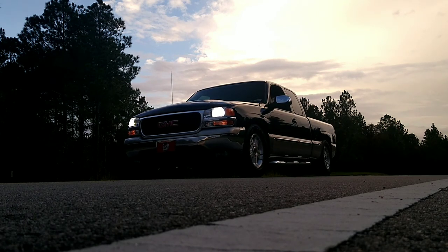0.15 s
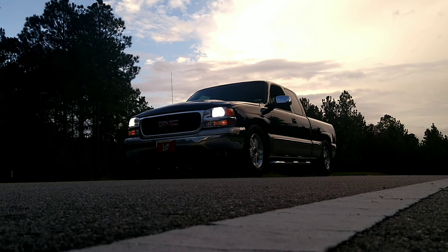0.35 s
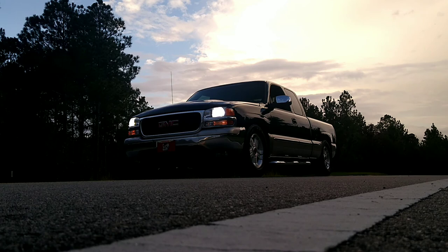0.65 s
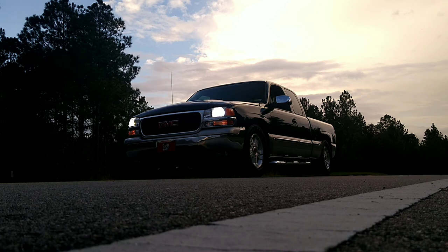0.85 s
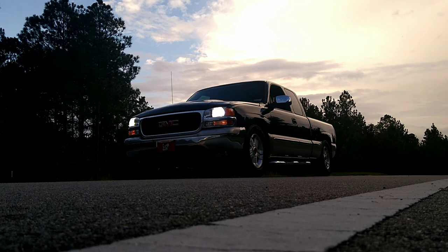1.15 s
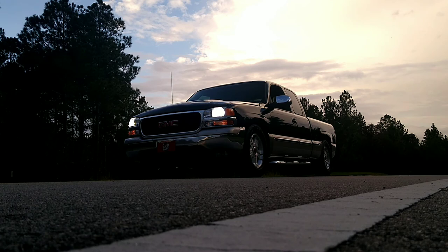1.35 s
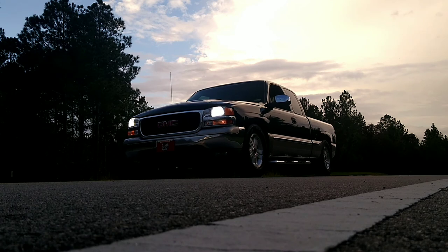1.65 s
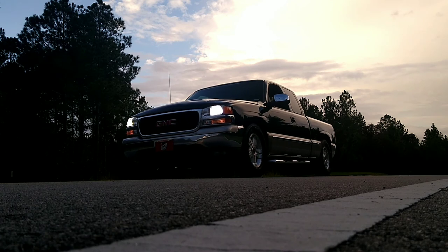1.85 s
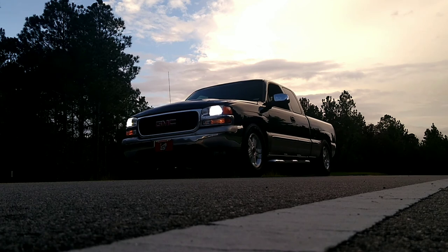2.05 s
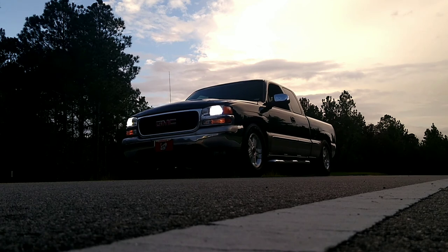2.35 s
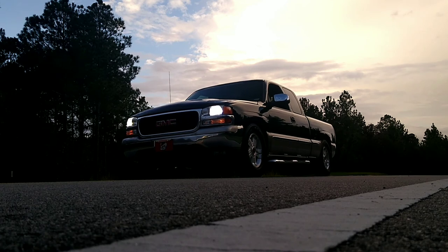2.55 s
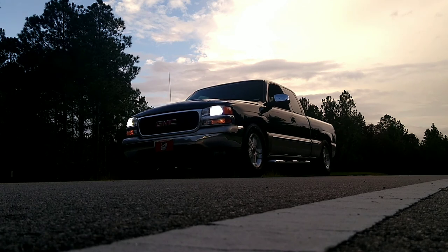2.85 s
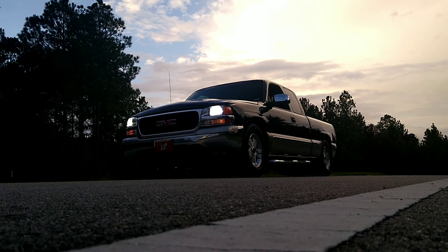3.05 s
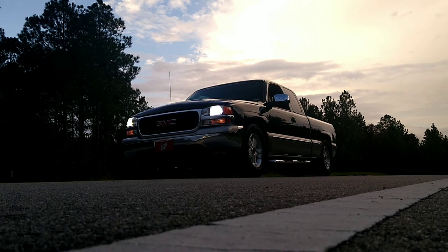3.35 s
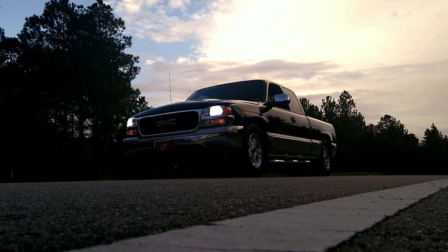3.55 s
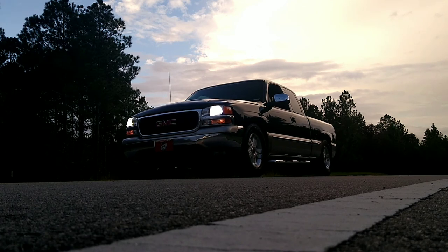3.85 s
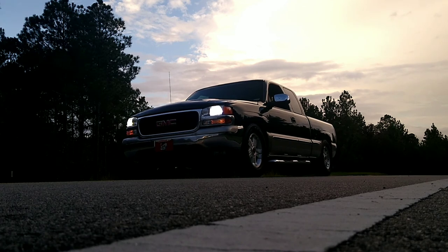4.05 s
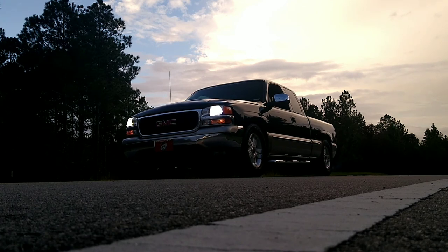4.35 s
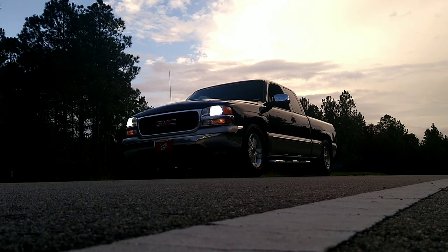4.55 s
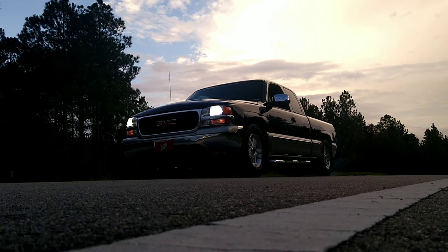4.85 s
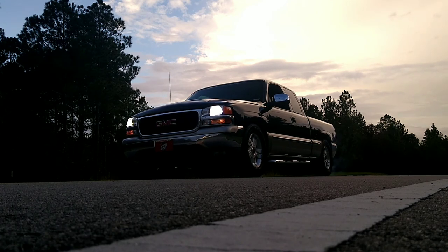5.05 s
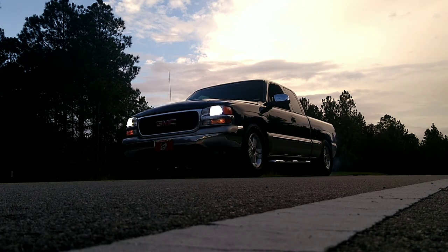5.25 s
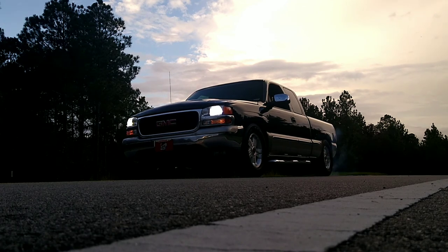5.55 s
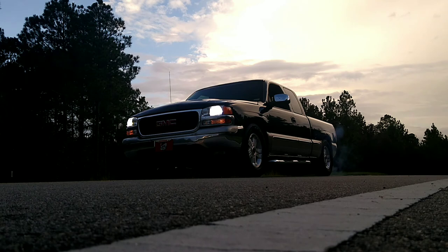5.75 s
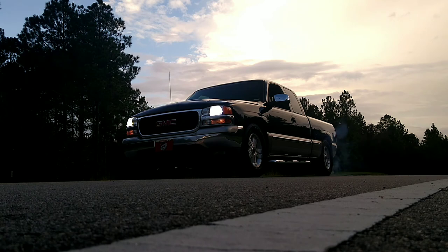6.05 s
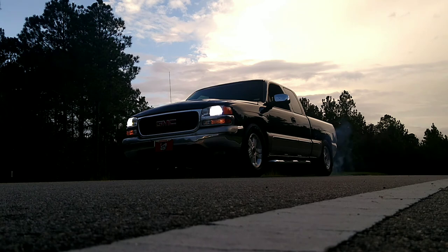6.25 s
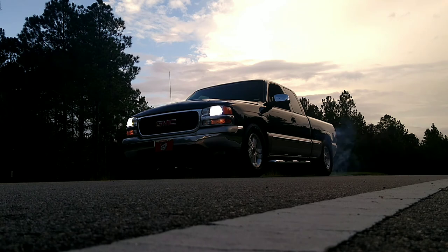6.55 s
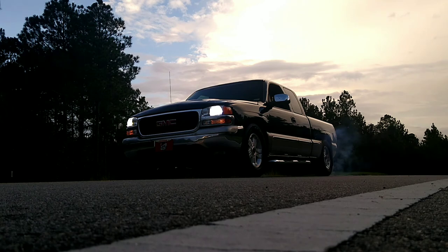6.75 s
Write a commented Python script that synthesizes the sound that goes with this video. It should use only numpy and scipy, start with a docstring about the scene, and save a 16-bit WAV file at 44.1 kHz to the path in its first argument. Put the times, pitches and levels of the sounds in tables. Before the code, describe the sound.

From 0 to 1.3 s a V8 pickup idles quietly outdoors: a low soft hum, slightly lumpy, slowing a little, with faint fan noise, hiss and thin belt whine. At about 1.27 s the intake gasps; from 1.4 s the throttle opens with uneven burbles, and the exhaust sweeps up, booming around 1.7 to 1.9 s, reaching a steady deep, raspy roar by 2.1 s with fan rush and faint whines. From 2.15 s tyre rubber scrubs hoarsely, several rough tones near 1.1 to 1.2 kHz under noisy spray. At 2.72 s, with a gruff thump, it scoops into one very loud squeal near 1.1 kHz. The squeal sways about twice a second, then faster, with chattering higher tones, flutter and tiny dropouts, slowly sagging and roughening. It sits slightly left above the held-back engine drone, which strains louder from 4.8 s. Both continue until the abrupt end at 6.9 s.

```python
"""On a road among trees, a V8 pickup idles, revs up against its brakes and spins its rear tyres.
The rubber first scrubs roughly: three patches of tone wander around one pitch, under a spray of noise.
Then it locks into one loud stick-slip squeal, a swaying sine with a second mode, sum tones and flutter.
The exhaust is a stack of lines at multiples of the cycle rate; coloured noise adds rasp, fan and hiss.
A gain control holds the loud parts down; the engine's lows sit in the middle and its highs spread wide."""
import sys
import numpy as np
from scipy import signal
from scipy.fft import rfft, irfft, next_fast_len
from scipy.io import wavfile
from scipy.ndimage import uniform_filter1d, minimum_filter1d, map_coordinates

SR = 44100
rng = np.random.default_rng(int(sys.argv[2]) if len(sys.argv) > 2 else 0)


def dump(signal):
    """Clip the signal to [-1, 1] and save it as 16-bit WAV at the path in sys.argv[1]."""
    limited = np.clip(np.atleast_2d(signal).T, -1, 1)
    pcm = np.round(limited * 32767).astype(np.int16)
    wavfile.write(sys.argv[1], SR, pcm)


N = 304731

# the tread locks into its squeal between these times [s]
CATCH_S, LOCKED_S = 2.715, 2.77
# the scrub swells, holds and dies away [s]
SCRUB_START_S, SCRUB_FULL_S, SCRUB_RELEASE_S, SCRUB_END_S = 2.14, 2.453, 2.7, 3.5

# moments when the rubber briefly loses its rhythm: (time [s], depth [dB], half width [s])
SKIP_DIPS = [(2.84, 7, 0.0097), (2.935, 7, .024), (3.674, 6, .006), (3.73, 7.5, .007), (4.112, 6, .005),
             (5.16, 5, .07), (5.315, 4.5, .016), (5.5, 4.5, 0.015), (5.64, 4.5, .018), (5.715, 3.5, 0.0087),
             (6.125, 5, .024), (6.735, 5.5, .008)]
# voices of the squeal: (level with cold rubber [dB], fade as it heats [dB/s])
MAIN_FADE = (3, 1.06)
SECOND_FADE = (-14, 2.5)
FAST_FLUTTER_FADE = (-16, 1.2)
SLOW_FLUTTER_FADE = (-20, 1.6)
# the main tone and its sum tones start this much weaker and recover as the scrub dies away
HELD_BACK_DB = 2


def squeal():
    """The main stick-slip tone, a second tread mode, their sum tones, and the flutter of the tread blocks."""
    db = fading(MAIN_FADE) - HELD_BACK_DB * (1 - rise(SCRUB_RELEASE_S, SCRUB_END_S))
    skip_db = bumps(SKIP_DIPS)
    # the rubber grows rougher as it heats; the roughness only ever dips the level
    heat = rise(2.7, 6.3)
    rough = 1 + 0.68 * heat
    falter_db = .4 * rough * wobble(110) ** 2
    main = angle(squeal_pitch(skip_db) + 4 * wobble(60)) + 0.056 * rough * wobble(260)
    # the second mode chatters, bending in pitch and sinking between bursts
    chatter = angle(23 + 9 * wobble(22))
    burst_db = 3.8 * np.cos(chatter) + 2.4 * wobble(70) + .9 * wobble(12)
    mode_ratio = 1.865
    bend_hz = 24 * np.cos(chatter + .7) + 17 * wobble(120)
    second = mode_ratio * main + angle(bend_hz)
    fast = angle(232 + 9 * wobble(60))
    slow = angle(112 + 14 * wobble(60))
    voice = amp(db - skip_db - falter_db) * tone(main)
    voice += amp(fading(SECOND_FADE) + burst_db) * tone(second)
    # octave and sum tones
    voice += amp(db - 29 + 0.78 * wobble(44)) * tone(2 * main)
    sum_tones = tone(main + second) + (0.15 + 0.24 * heat) * tone(main + second + fast)
    voice += amp(db - 20.5 - skip_db + burst_db) * sum_tones
    voice += amp(db - 34 + burst_db) * tone(2 * main + second)
    # flutter puts side tones around the squeal, stronger above than below; the fast kind settles early
    fast_db = fading(FAST_FLUTTER_FADE) - 14.0 * rise(4.0, 4.15)
    fast_sides = tone(main + fast) - 0.23 * tone(main - fast)
    voice += amp(fast_db + 2.3 * wobble(30)) * fast_sides
    slow_sides = tone(main + slow) - .5 * tone(main - slow)
    voice += amp(fading(SLOW_FLUTTER_FADE) + 2.5 * wobble(30)) * slow_sides
    return rise(CATCH_S, LOCKED_S) ** 2 * voice


# apart from sway and scoop, the pitch is highest at CREST_S and sags ever faster after it
SQUEAL_HZ, CREST_S, SAG_HZ_PER_S2 = 1112.8, 3.54, 3.75
# the wheel: when a turn starts, turns a second then, and their growth a second
TURN_S, WHEEL_HZ, WHEEL_HZ_PER_S = 2.783, 2.09, .175
# pitch sway once and twice a turn, and the pitch lift while the rubber skips
SWAY_HZ, LEAN_HZ, SKIP_HZ_PER_DB = 9, 3.8, 2
# the squeal starts flat and scoops up to its pitch
SCOOP_HZ, SCOOP_S = 40.08, 0.03496


def squeal_pitch(skip_db):
    """The pitch sags as the rubber heats, climbs and drops with each turn of the wheel, and lifts in a skip."""
    t = clock() - TURN_S
    turn = 2 * np.pi * (WHEEL_HZ * t + WHEEL_HZ_PER_S * t ** 2 / 2)
    sway = SWAY_HZ * np.cos(turn) + LEAN_HZ * np.sin(2 * turn)
    scoop = SCOOP_HZ * np.exp(-np.maximum(clock() - CATCH_S, 0) / SCOOP_S)
    sag = SAG_HZ_PER_S2 * (clock() - CREST_S) ** 2
    return SQUEAL_HZ - sag + sway - scoop + SKIP_HZ_PER_DB * skip_db


# centre pitch that the patches scatter around: (time [s], pitch [Hz])
SCRUB_PITCH = [(2.2, 1084), (2.4, 1149), (2.56, 1221), (2.8, 1155), (3, 1133)]
# colour of the spray of noise while the tread scrubs: (frequency [Hz], relative density [dB per Hz])
SPRAY_COLOUR = [(1200, -20), (2200, 5.5), (3000, -1.5), (3800, 0), (4600, -14.5), (6000, -33.5),
                (9000, -44.5)]
# stereo width of the tyre noise: (frequency [Hz], left-right likeness [-1 to 1])
TYRE_WIDTH = [(1000, 1), (2300, .65), (3100, 0.86), (4500, 1), (7000, 0.14)]


def scrub():
    """Before the tread locks into one rhythm, three patches of it stick and slip at scattered pitches."""
    hz, = curves(SCRUB_PITCH)
    release = 1 - rise(SCRUB_RELEASE_S, SCRUB_END_S)
    low, high = np.zeros(N), np.zeros(N)
    # the patches start far apart in pitch and pull together
    spread = 1 - .42 * rise(2.28, 2.45)
    for detune, patch_db in [(-.11, -5), (0, 1), (.11, -3)]:
        slip = angle(hz * (1 + spread * detune + .019 * wobble(80))) + 0.29 * wobble(300)
        low += amp(patch_db + 1.5 * wobble(60)) * tone(slip)
        high += amp(2.6 * wobble(70)) * tone(1.97 * slip + 0.67 * wobble(200))
    spray = amp(-20 + 2.5 * wobble(60)) * rush(SPRAY_COLOUR, TYRE_WIDTH)
    # the upper mode speaks sooner; the squeal takes over the lower one once it catches
    caught = rise(CATCH_S, LOCKED_S)
    lower = rise(SCRUB_START_S, SCRUB_FULL_S) * amp(-10.5 - 2.7 * caught) * unit(low)
    upper = rise(SCRUB_START_S, 2.316) * amp(2.5 * caught) * (amp(-18.5) * unit(high) + spray)
    return release * (lower + upper)


# balance of the whole tyre: (time [s], how much louder on the left [dB])
TYRE_BALANCE = [(2.3, 1), (4.2, .9), (4.9, .5), (5.3, .7), (5.7, 1.7), (6.9, 2)]
# colour of the rubber's friction noise: (frequency [Hz], relative density [dB per Hz])
RUBBER_COLOUR = [(500, -46.5), (750, -10), (900, -4.5), (1050, 4.5), (1200, 2), (1450, 1.5), (1750, -1),
                 (2150, -1), (2700, -6), (3300, -10.5), (3800, -11.5), (5000, -20.5), (6000, -28),
                 (9000, -54)]
# colour of hiss, for rubber dust and engine alike: (frequency [Hz], relative density [dB per Hz])
HISS_COLOUR = [(5000, -31.5), (7300, -15.5), (9000, 1.5), (11500, 5), (13000, 1.5), (14500, -7),
               (16000, -18)]
# friction noise and dust hiss: (level with cold rubber [dB], fade as it heats [dB/s])
FRICTION_FADE = (-11.5, 0.77)
DUST_FADE = (-43.5, 2.5)


def tyre():
    """Scrub, squeal, friction and dust are louder on the left but reach the left microphone slightly later."""
    pan_db, = curves(TYRE_BALANCE)
    grip_db = 0.96 * wobble(14) + wobble(45) + 0.39 * wobble(250)
    spinning = rise(2.22, 2.95) ** 2
    friction = amp(fading(FRICTION_FADE) + grip_db) * spinning * rush(RUBBER_COLOUR, TYRE_WIDTH)
    dust = amp(fading(DUST_FADE) + 2 * wobble(12)) * spinning * rush(HISS_COLOUR, TYRE_WIDTH)
    sound = friction + dust + scrub() + squeal()
    lag_s = 0.00011
    sides = np.array([[1], [-1]])
    delayed = filtered(sound, lambda hz: np.exp(-1j * np.pi * hz * lag_s * sides))
    return amp(sides * pan_db / 2) * delayed


def fading(layer):
    """Level in dB of a tyre voice, falling steadily once the squeal has caught."""
    cold_db, db_per_s = layer
    return cold_db - db_per_s * np.maximum(clock() - CATCH_S, 0)


# cycle rates at full revs and at idle
FULL_REVS_HZ, IDLE_HZ = 21.6, 6.2
# exhaust lines at full revs: (multiple of the cycle rate, relative level [dB])
LOADED_LINES = [(1, -29), (2, -30.5), (3, -9), (4, -22.5), (5, 1), (6, -16.5), (7, -19.5), (8, 0.5),
                (9, -2), (10, -4), (11, -11.5), (12, -16), (13, -20.5), (14, -14), (16, -11), (17, -13.5),
                (18, -20), (19, -8.5), (20, -10.5), (26, -8), (27, -16), (32, -7.5)]
# how the exhaust pipe colours the lines: (frequency [Hz], relative gain [dB])
PIPE_COLOUR = [(20, -29.5), (60, -9), (90, -1), (118, -3), (145, -15), (180, -13), (215, -9.5),
               (270, -24.5), (400, -20.5), (490, -29.5), (565, -23.5), (620, -33), (695, -22.5)]
# noise under the loaded exhaust: (frequency [Hz], relative density [dB per Hz])
RUMBLE_COLOUR = [(15, -41.5), (28, -26), (50, 0.5), (110, -0.5), (150, 2.5), (210, 4), (260, -7),
                 (400, -49)]
# burble between firings at idle: (frequency [Hz], relative density [dB per Hz])
BURBLE_COLOUR = [(15, -26), (25, -23), (36, -7.5), (55, 0.5), (100, -0.5), (135, -1), (195, 2.5),
                 (250, -7.5), (320, -9), (500, -37.5)]
# stereo width of the engine noise: (frequency [Hz], left-right likeness [-1 to 1])
ENGINE_WIDTH = [(100, 0.97), (300, 0.99), (700, 1), (1400, .85), (3000, 0.7), (5000, 0.025), (8000, 0.033)]
# surges and stumbles at low revs: (time [s], gain [dB], half width [s])
LOPE_BUMPS = [(.28, -7, .025), (.63, 3.5, 0.026), (.84, -4, .02), (1.31, -4.5, .05), (1.415, 5, .025),
              (1.49, 4, 0.02)]
# exhaust: (level at idle [dB], gain from the open throttle [dB], further gain at full revs [dB])
BOOM_EFFORT = (-42, 11.5, 8.5)
# the exhaust booms as the firing rate sweeps through this resonance
BOOM_HZ, BOOM_WIDTH_HZ, BOOM_PEAK_DB = 115.3, 16, 8.5
# the exhaust grows a little louder as the truck strains on
STRAIN_FROM_S, STRAIN_RISE_DB_PER_S = 4.8, 0.44


def exhaust(cycle_hz, crank):
    """V8 firing gives lines at multiples of the cycle rate; all swells as firing crosses the pipe's resonance."""
    load = rise(1.43, 1.53)
    cylinders = 8
    resonance_db = BOOM_PEAK_DB * np.exp(-((cylinders * cycle_hz - BOOM_HZ) / BOOM_WIDTH_HZ) ** 2)
    boom_db = effort(BOOM_EFFORT, cycle_hz) + resonance_db + bumps(LOPE_BUMPS)
    boom_db += STRAIN_RISE_DB_PER_S * np.maximum(clock() - STRAIN_FROM_S, 0)
    # the firing line leads while the engine picks up; the other lines grow with the load
    light_load_db = -6 * (1 - rise(1.73, 2.23))
    lines, power = np.zeros(N), np.zeros(N)
    for multiple, db in LOADED_LINES:
        order = round(multiple)
        pipe_db = along(PIPE_COLOUR, order * cycle_hz) - along(PIPE_COLOUR, order * FULL_REVS_HZ)
        gain = amp(db + pipe_db + light_load_db * (order != cylinders))
        # the pipe delays each line differently, which smears the firings into an even drone
        smear = 3 * np.pi / 8 * order ** 2
        lines += gain * amp(1.2 * wobble(14)) * tone(order * crank + smear)
        power += gain ** 2
    rumble = amp(-11.5) * rush(RUMBLE_COLOUR, ENGINE_WIDTH)
    loaded = amp(-0.75) * lines / np.sqrt(power) + rumble
    # at idle the pipe picks out twice the firing rate
    hum = 2 * cylinders * crank
    idle = amp(-0.5 + 1.0 * wobble(15.6)) * tone(hum)
    idle += amp(-17.0 + 2.0 * wobble(8.6)) * tone(2 * hum)
    # the first gulps of air burn unevenly: less hum, more burble
    gulp = rise(1.34, 1.46)
    idle = amp(-1.5 * gulp) * idle + amp(-10 + 4 * gulp) * rush(BURBLE_COLOUR, ENGINE_WIDTH)
    return amp(boom_db) * (np.sqrt(load) * loaded + np.sqrt(1 - load) * idle)


# engine speed: (time [s], cycle rate [Hz], eight firings a cycle)
REV_CURVE = [(0, 7), (.85, 6.3), (1.3, 6.05), (1.43, 6.2), (1.5, 7.9), (1.68, 14.3), (1.85, 18.3),
             (2, 20.6), (2.1, 21.5), (2.27, 22), (2.7, 21.3), (5.2, 21.62), (6.91, 22.05)]
# gas noise: (frequency [Hz], relative density [dB per Hz])
RASP_COLOUR = [(150, -37), (270, -7), (380, 1.5), (520, 0), (700, 1), (900, -10.5), (1400, -16),
               (3000, -63)]
# fan noise: (frequency [Hz], relative density [dB per Hz])
FAN_COLOUR = [(400, -31.5), (850, -2), (1050, 3), (1500, 0), (2300, -1), (3000, -5), (4000, -9),
              (5200, -15), (6300, -21), (7300, -34), (10000, -49.5)]
# layers: (level at idle [dB], gain from the open throttle [dB], further gain at full revs [dB])
RASP_EFFORT = (-53, 8.5, 13.5)
FAN_EFFORT = (-55, 9, 17.5)
HISS_EFFORT = (-71, 14.5, 12.5)
# the intake gasps just before the revs rise: (time [s], gain [dB], half width [s])
GASP_BUMP = [(1.265, 7.5, .03)]
# a gruff thump as the squeal catches: (time [s], gain [dB], half width [s])
THUMP_BUMP = [(2.725, 8, .025)]


def engine():
    """The exhaust, gas noise puffing to the firing rhythm, the fan, hiss, and faint whines from the belt drive."""
    cycle_hz, = curves(REV_CURVE)
    rasp_db = effort(RASP_EFFORT, cycle_hz) + bumps(THUMP_BUMP) + .5 * bumps(LOPE_BUMPS)
    fan_db = effort(FAN_EFFORT, cycle_hz) + .9 * bumps(GASP_BUMP) + 0.27 * bumps(LOPE_BUMPS)
    hiss_db = effort(HISS_EFFORT, cycle_hz) + bumps(GASP_BUMP)
    crank = angle(cycle_hz * (1 + .002 * wobble(18)))
    firing, bank = 8 * crank, 5 * crank
    idling = 1 - rise(1.1, 1.8)
    # the puffs are shallow at idle and deepen with the revs
    rhythm = 0.38 * np.cos(firing) + 0.62 * np.cos(bank) + 0.1 * np.cos(2 * crank)
    puffs = unit(1 + (1 - 0.79 * idling) * rhythm)
    churn = 1 + 0.22 * (puffs - 1)
    rasp = amp(rasp_db) * puffs * rush(RASP_COLOUR, ENGINE_WIDTH)
    fan = amp(fan_db + 1.1 * wobble(18)) * churn * rush(FAN_COLOUR, ENGINE_WIDTH)
    # the hiss leans left
    hiss = amp([[1.3], [-1.3]]) * rush(HISS_COLOUR, ENGINE_WIDTH)
    hiss *= amp(hiss_db + 1.1 * wobble(12) + .6 * wobble(7)) * churn
    pulley, alternator, pump = 154 * crank, 115.3 * crank, 96 * crank
    whine = amp(-60.0 + 2.1 * wobble(24.9)) * rise(.2, 0.64) * idling * tone(pulley + 1.1 * wobble(69.8))
    whine += amp(-41.5 + 4 * wobble(30)) * rise(1.55, 1.95) * tone(alternator + 1.2 * wobble(90))
    whine += amp(-45 + 2.4 * wobble(25)) * rise(1.4, 1.9) * tone(pump + 1.4 * wobble(90))
    return exhaust(cycle_hz, crank) + rasp + fan + hiss + whine


# the throttle opens between these times [s]
THROTTLE_S, OPEN_S = 1.37, 1.5


def effort(layer, cycle_hz):
    """Level in dB of an engine layer: it jumps with the throttle and climbs with the revs."""
    idle_db, throttle_db, revs_db = layer
    speed = (cycle_hz - IDLE_HZ) / (FULL_REVS_HZ - IDLE_HZ)
    return idle_db + throttle_db * rise(THROTTLE_S, OPEN_S) + revs_db * speed


def amp(db):
    """Decibels to gain."""
    return 10 ** (np.asarray(db) / 20)


def unit(x):
    """Scale to rms 1."""
    return x / np.sqrt(np.mean(x ** 2) + 1e-20)


def clock():
    """The time of each sample in seconds."""
    return np.arange(N) / SR


def along(points, hz):
    """Read (frequency [Hz], value) points on a log frequency axis."""
    f, v = np.transpose(points)
    return np.interp(np.log(hz + 1), np.log(f + 1), v)


def curves(rows):
    """One value per sample for each column after the time."""
    s, *cols = np.transpose(rows)
    return [np.interp(clock(), s, c) for c in cols]


def rise(start, end):
    """A ramp from 0 to 1 between two times."""
    return np.clip((clock() - start) / max(end - start, 1e-3), 0, 1)


def bumps(rows):
    """Smooth bell-shaped level changes in dB from (time [s], gain [dB], half width [s]) rows."""
    return sum(db * np.exp(-((clock() - s) / width) ** 2) for s, db, width in rows)


def wobble(rate):
    """A smooth random curve, rate knots a second."""
    knots = rng.standard_normal(8192)
    return map_coordinates(knots, [clock() * rate], mode="wrap")


def angle(hz):
    """Running phase of a changing frequency."""
    return 2 * np.pi * np.cumsum(hz) / SR


def tone(phase):
    """A sine of rms 1."""
    return np.sqrt(2) * np.sin(phase)


def filtered(x, response):
    """x passed through a complex response of frequency."""
    size = next_fast_len(N + 8192)
    return irfft(rfft(x, size) * response(np.fft.rfftfreq(size, 1 / SR)), size)[..., :N]


def rush(spectrum, alike):
    """Stereo noise of rms 1 with a given colour and left-right likeness."""
    def colour(hz):
        # the likeness sets how the power splits between mid and side
        turn = np.arccos(np.clip(along(alike, hz), -1, 1)) / 2
        return amp(along(spectrum, hz)) * [np.cos(turn), np.sin(turn)]
    mid, side = filtered(rng.standard_normal((2, N)), colour)
    return unit(np.array([mid + side, mid - side]))


# where the gain control starts, dB taken off per dB above that, reaction time
THRESHOLD_DB, SQUEEZE, REACT_S = -18.5, .5, 0.055


def gain_control(x):
    """The gain falls as the sound grows loud, so the squeal pushes the engine into the background."""
    keep = np.exp(-1 / (REACT_S * SR))
    power = signal.lfilter([1 - keep], [1, -keep], np.mean(x ** 2, axis=0))
    over_db = np.maximum(10 * np.log10(power + 1e-12) - THRESHOLD_DB, 0)
    return x * amp(-SQUEEZE * over_db)


def scene():
    """The spinning tyre and the engine."""
    return tyre() + engine()


# nothing passes above this frequency
TOP_HZ = 15700


def record(dry):
    """Ride the gain, limit the highest peaks, fade the last 4 ms and cut all above the band limit."""
    held = gain_control(dry)
    ceiling = .95
    needed = ceiling / np.maximum(np.abs(held).max(axis=0), ceiling)
    # hold each gain dip and round it off over 10 ms
    gain = uniform_filter1d(minimum_filter1d(needed, size=441), size=441)
    soft_end = np.clip((N / SR - clock()) / .004, 0, 1) ** 2
    return filtered(held * gain * soft_end, lambda hz: hz < TOP_HZ)


dry = scene()
out = record(dry)
dump(out)
```